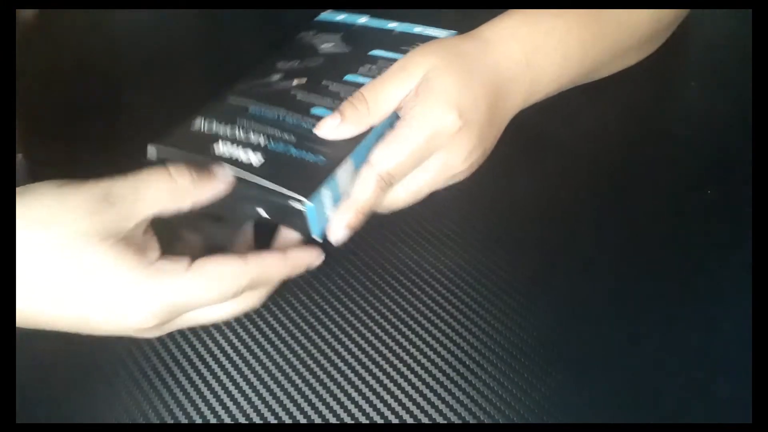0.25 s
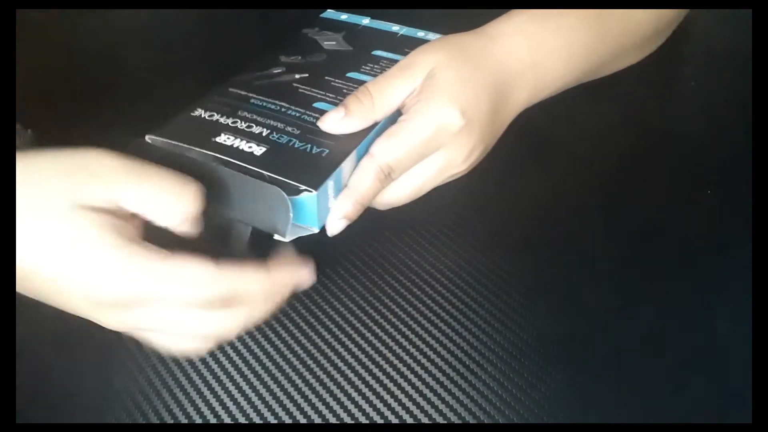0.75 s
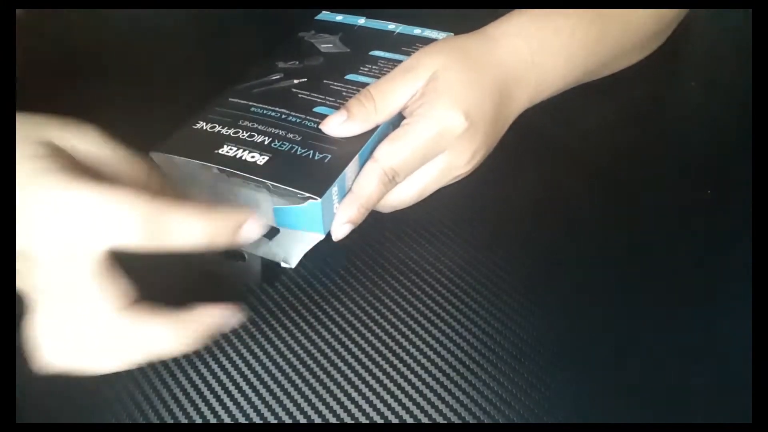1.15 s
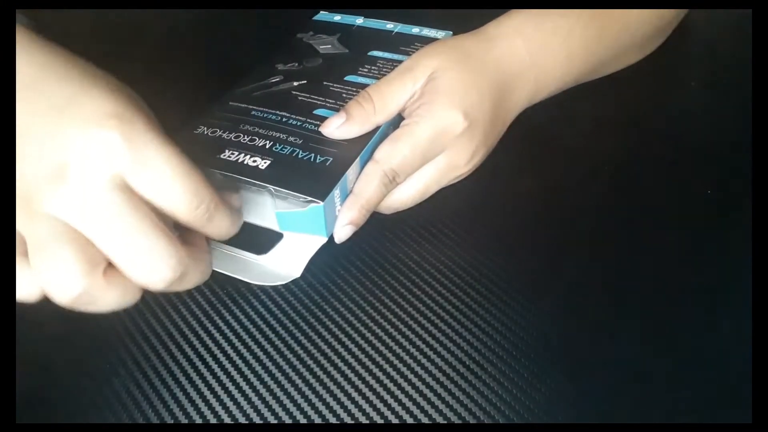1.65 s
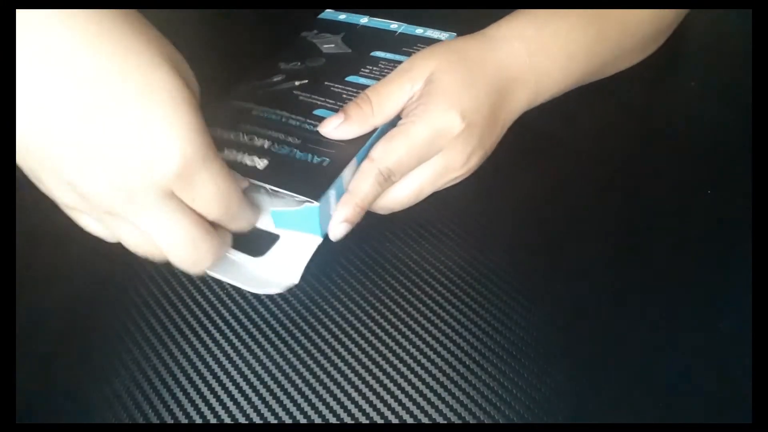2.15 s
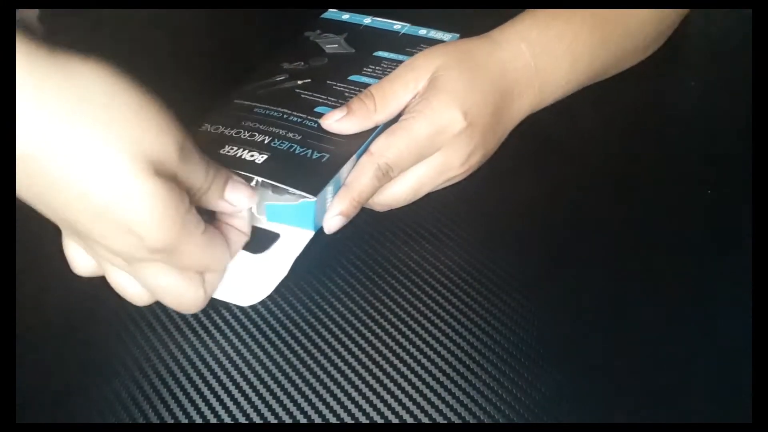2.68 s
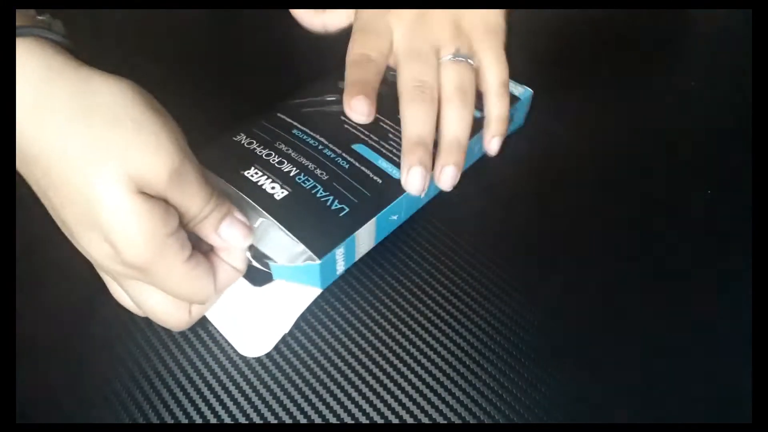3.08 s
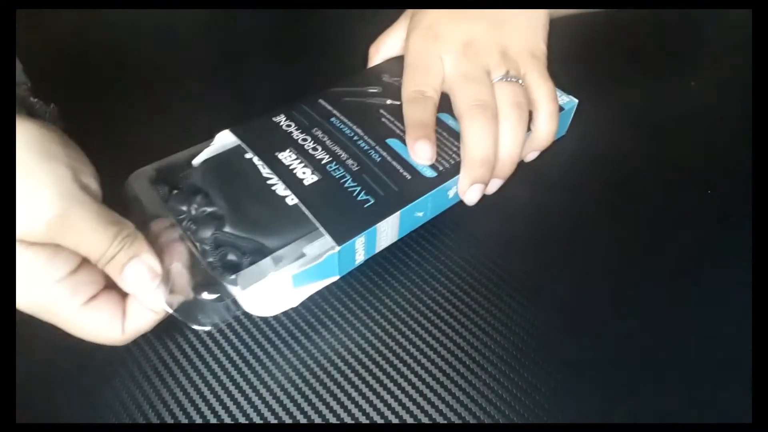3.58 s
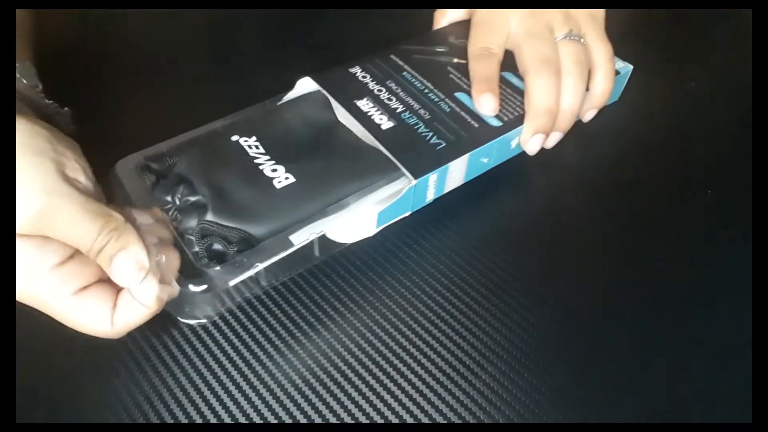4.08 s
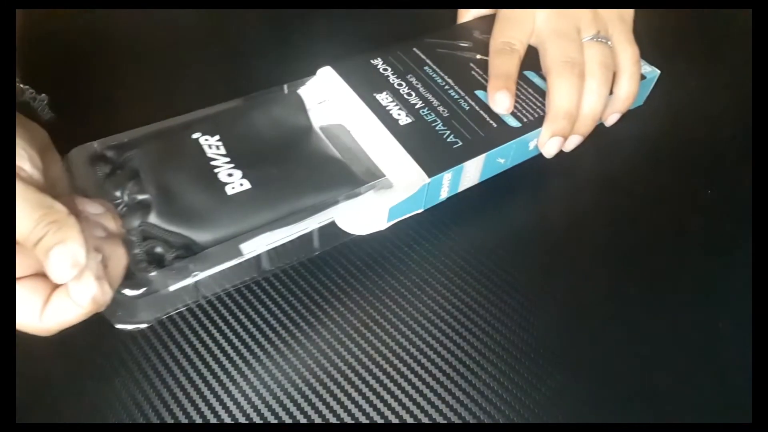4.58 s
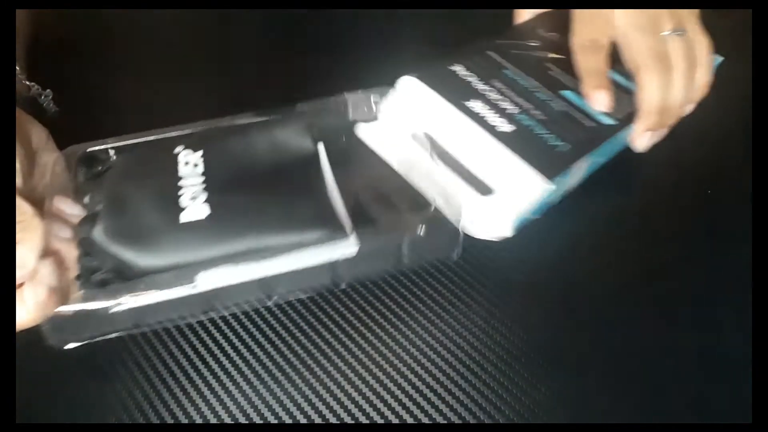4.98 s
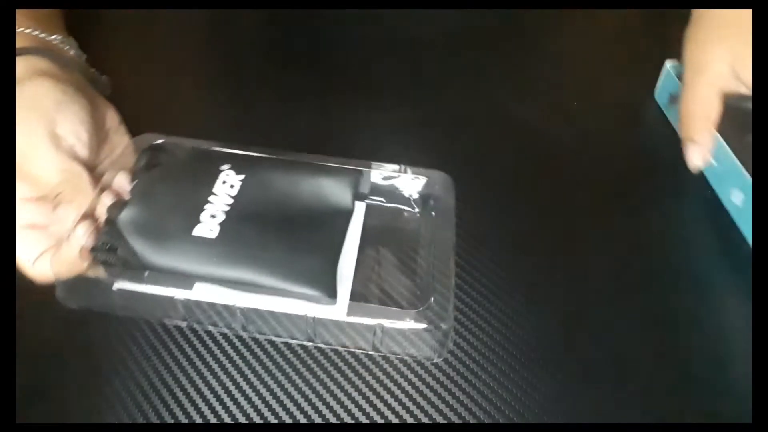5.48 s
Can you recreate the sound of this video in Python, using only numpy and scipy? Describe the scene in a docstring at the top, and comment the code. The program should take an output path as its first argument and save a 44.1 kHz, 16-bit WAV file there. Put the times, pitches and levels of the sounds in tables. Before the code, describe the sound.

Close, dry rustling of a cardboard box being opened, broken by sharp clicks, then a plastic tray scraping and crackling its way out.

```python
"""Soft rubbing and small snaps, close to a stereo microphone: hands open a cardboard box and slide a thin
plastic tray out of it. Stick-slip friction of fingers and tray on the board makes the rasp; buckling flaps
and tray snap and crackle. Both excite the modes of the sheets and the air in the box.
A small room reverberates; a low rumble, a brief hum and a faint hiss lie below."""
import sys
import numpy as np
from scipy import signal
from scipy.fft import rfft, irfft, next_fast_len
from scipy.io import wavfile

SR = 44100
rng = np.random.default_rng(int(sys.argv[2]) if len(sys.argv) > 2 else 0)


def generate_wav(sig):
    """Save sig (samples, or channels by samples) to the path in sys.argv[1] as 16-bit PCM at SR."""
    pcm = np.round(np.clip(np.atleast_2d(sig).T, -1, 1) * 32767).astype(np.int16)
    wavfile.write(sys.argv[1], SR, pcm)


N = 253310

# likeness of left and right: f/Hz, correlation
COHERENCE = [(60, .87), (300, 0.83), (1000, 0.66), (3000, 0.24), (12000, 0.16)]
# bending modes of board and tray: f/Hz, bandwidth/Hz, level/dB
SHEET_MODES = [(2390, 74, 4), (3007, 270, 3.5), (3850, 330, 2.5), (4820, 150, 2), (5700, 90, -2.5),
               (6716, 400, 4)]


def from_db(db):
    """Amplitude ratio of a level in dB."""
    return 10 ** (np.asarray(db) / 20)


def unit_rms(x):
    """Normalisation of each row to rms 1."""
    return x / np.sqrt(np.mean(x ** 2, axis=-1, keepdims=True) + 1e-20)


def in_time(rows):
    """Linear interpolation in time: one value per sample for each column after t/s."""
    times, *columns = np.transpose(rows)
    return [np.interp(np.arange(N) / SR, times, column) for column in columns]


def at_hz(points, hz):
    """Interpolation on a logarithmic frequency axis."""
    freqs, values = np.transpose(points)
    return np.interp(np.log(np.maximum(hz, 1)), np.log(freqs), values)


def band(x, low_hz, high_hz, order=2):
    """Maximally flat band-pass."""
    return signal.sosfilt(signal.butter(order, [low_hz, high_hz], "band", fs=SR, output="sos"), x)


def resonance(x, hz, width_hz):
    """Damped two-pole resonator of peak gain 1."""
    r = np.exp(-np.pi * width_hz / SR)
    poles = [1, -2 * r * np.cos(2 * np.pi * hz / SR), r * r]
    return signal.lfilter(np.array([1, 0, -1]) * (1 - r * r) / 2, poles, x)


def gliding_resonance(x, hz, width_hz):
    """Time-varying resonator, retuned block by block; the noise power passed stays even."""
    out, state, block = np.zeros_like(x), np.zeros((len(x), 2)), 256
    r = np.exp(-np.pi * np.maximum(width_hz, 20) / SR)
    for i in range(0, N, block):
        poles = [1, -2 * r[i] * np.cos(2 * np.pi * hz[i] / SR), r[i] ** 2]
        zeros = np.sqrt(1 - r[i] ** 2) * np.array([1, 0, -1])
        out[:, i:i + block], state = signal.lfilter(zeros, poles, x[:, i:i + block], zi=state)
    return unit_rms(out)


def drift(rate_hz):
    """Random modulation: low-passed noise of rms 1."""
    r = np.exp(-2 * np.pi * rate_hz / SR)
    return unit_rms(signal.lfilter([1], [1, -2 * r, r * r], rng.standard_normal(N + SR))[SR:])


def stereo_pair(mid, side, hz):
    """Partial coherence: sum and difference of unrelated signals give two sides, alike in the bass."""
    alike = np.clip(at_hz(COHERENCE, hz), 0, 1)
    return np.sqrt(1 + alike) * mid + np.sqrt(1 - alike) * side * [[1], [-1]]


def coloured(pair, spectrum):
    """Spectral shaping of two unrelated noises into left and right, each of rms 1."""
    size = next_fast_len(N)
    hz = np.arange(size // 2 + 1) * SR / size
    mid, side = rfft(pair, size) * from_db(at_hz(spectrum, hz))
    return unit_rms(irfft(stereo_pair(mid, side, hz), size)[:, :N])


def hiss(level_db=-71):
    """Stationary broadband noise: a faint steady hiss."""
    # noise spectrum: f/Hz, relative density/dB
    spectrum = [(180, -38), (300, -11.5), (2100, -20), (3460, -5.5), (7440, -8.5), (7820, -18),
                (15000, -2.5), (16000, -19)]
    return from_db(level_db) * coloured(rng.standard_normal((2, N)), spectrum)


def rumble():
    """Amplitude-modulated low noise: a rumble that comes and goes."""
    # envelope: t/s, level/dB
    envelope = [(0, -67.5), (.72, -65), (.9, -73), (1.7, -72.5), (2.3, -70), (2.9, -65), (3.13, -73),
                (3.8, -80), (4.05, -68), (4.9, -70), (5.74, -70.5)]
    # noise spectrum: f/Hz, relative density/dB
    spectrum = [(15, -35), (25, -17.5), (87, 2.5), (142, -1.5), (232, -13), (400, -12.5), (520, -43.5),
                (880, -120)]
    return from_db(in_time(envelope)[0]) * coloured(rng.standard_normal((2, N)), spectrum)


def hum(hz=110.4, width_hz=9.1):
    """Narrow-band noise is heard as a pitch: a low hum that swells briefly."""
    # envelope: t/s, level/dB
    envelope = [(2.05, -90.5), (2.2, -70), (2.4, -69.5), (2.58, -66.5), (2.66, -88.5)]
    return from_db(in_time(envelope)[0]) * unit_rms(resonance(rng.standard_normal(N), hz, width_hz))


def room(x, first_echo_s=0.0045):
    """Diffuse reverberation: convolution with octave bands of noise, each decaying exponentially."""
    # reverberation time: f/Hz, T60/s
    decay_times = [(200, 0.45), (530, 0.35), (1390, 0.32), (3680, 0.34), (9700, 0.36)]
    t, response = np.arange(SR // 2) / SR, 0
    for hz in 125 * 2.0 ** np.arange(8):
        mid, side = band(rng.standard_normal((2, len(t))), hz / np.sqrt(2), min(hz * np.sqrt(2), 20000))
        response += stereo_pair(mid, side, hz) * from_db(-60 * t / at_hz(decay_times, hz))
    response *= np.clip((t - first_echo_s) / 0.00043, 0, 1)
    response /= np.sqrt(np.sum(response ** 2, axis=1, keepdims=True))
    return signal.fftconvolve(x[None], response, axes=1)[:, :N]


def localise(x):
    """Level and time differences between the sides give the direction of hands and tray."""
    # place of the hands: t/s, left minus right level/dB
    balance = [(0.0, -2), (4.97, -1.5), (5.45, 2.5), (5.74, -2)]
    # the tray moves left: t/s, delay of the right side/ms
    lag = [(0, 0.013), (4.4, 0.041), (4.8, 0.056), (5.25, 0.18), (5.6, 0.4)]
    pan_db = in_time(balance)[0]
    delayed = np.arange(N) - np.round(in_time(lag)[0] * SR / 1000)
    right = x[1][np.clip(delayed, 0, N - 1).astype(int)]
    return np.array([x[0] * from_db(pan_db / 2), right * from_db(-pan_db / 2)])


def stroke_gains(grip_s=0.014, release_db_per_s=501.5):
    """Incoherent strokes add in power; each grips, swells or fades, then lets go."""
    # rubbing strokes: t/s, duration/s, rasp level/dB, swell/dB, body re rasp/dB, treble re rasp/dB
    strokes = [(0.0, 0.024, -57, -18, 6, 4), (0.015, 0.043, -70, 5, -2.5, 8),
               (0.089, 0.078, -81.5, 3, 10.5, -1), (0.179, 0.12, -65.5, 10, -2, -1.5),
               (0.248, 0.21, -56.5, 6.5, 1.5, -5.5), (0.458, 0.11, -52.5, 8.5, -8.5, -1.5),
               (0.553, 0.028, -46, 23, -3.5, 0.5), (0.587, 0.022, -35, -7, -4, -16),
               (0.692, 0.1, -44.5, -5.5, -7, 0), (1.024, 0.11, -69, -0.5, -4.5, -0.5),
               (1.11, 0.19, -61.5, -7, -13, -15), (1.302, 0.059, -66, -9.5, 4.5, -4),
               (1.411, 0.019, -58, 1, -8, -1.5), (1.457, 0.11, -61, 13, -10.5, -6),
               (1.766, 0.036, -67, 3, -9.5, -8.5), (1.875, 0.12, -53.5, -1, -0.5, -3),
               (2.017, 0.031, -57, 12.5, -9.5, -4), (2.101, 0.066, -60.5, -7.5, 2, -1.5),
               (2.176, 0.079, -55, 0, -2.5, -6.5), (2.291, 0.16, -58, 0, -1, -6.5),
               (2.546, 0.15, -63.5, 9, -2, -6), (2.709, 0.073, -25.5, -11.5, -12.5, 1.5),
               (2.883, 0.055, -55, -0.5, 9.5, -1), (2.97, 0.3, -68.5, -17.5, 8.5, -0.5),
               (3.067, 0.047, -56, -11.5, -3.5, -2), (3.207, 0.046, -63.5, -4.5, 2, -6.5),
               (3.285, 0.11, -56.5, 11.5, -6, -6), (3.401, 0.16, -45, -20.5, -6, -10),
               (3.567, 0.472, -62, 6, 1.5, -4), (4.022, 0.34, -60.5, -2, -3.5, -3),
               (4.446, 0.16, -69, 5.5, -1, -2.5), (4.613, 0.11, -44.5, -10.5, -3, -9.5),
               (4.714, 0.3, -51.5, 2.5, -1, -7), (4.952, 0.013, -30.5, -1, -3, -7.5),
               (5.012, 0.055, -45, 10, -8, -13.5), (5.089, 0.15, -35, -5.5, -9.5, -4.5),
               (5.3, 0.13, -37.5, -6.5, -8, -9), (5.393, 0.05, -41, 7, -14, -4),
               (5.445, .16, -38.5, -13.5, -8.5, -9), (5.522, 0.067, -58, -4, 12, -11),
               (5.605, 0.052, -48.5, 1, -6.5, -11.5), (5.67, 0.067, -47, -4, -9.5, -15.5)]
    t, power = np.arange(N) / SR, np.zeros((3, N))
    for start, length, rasp_db, swell_db, body_db, treble_db in strokes:
        span = slice(int(start * SR), int((start + length) * SR) + SR // 4)
        age = np.maximum(t[span] - start, 0)
        release_db = release_db_per_s * np.maximum(age - length, 0)
        level_db = rasp_db + swell_db * np.minimum(age / length, 1) - release_db
        envelope = np.minimum(age / grip_s, 1) * from_db(level_db)
        power[:, span] += (envelope * from_db([[0], [body_db], [treble_db]])) ** 2
    return np.sqrt(power)


def shifting_modes(x):
    """Modal modulation: as the contact moves and the sheet bends, modes come, go and slide in pitch."""
    out = 0
    for hz, width, db in SHEET_MODES:
        slide, swell_db = 1 + .05 * drift(2), 3 * drift(7)
        mode = gliding_resonance(x, hz * slide, np.full(N, width))
        out += np.sqrt(width) * from_db(db + swell_db) * mode
    return out


def rubbing(median_breaks_per_s=90, break_db=15, bump_share=0.14, room_db=-5.5):
    """Stick-slip friction: fibres slip and break in clumps, driving the box's air and the sheet modes."""
    # friction spectrum: f/Hz, relative density/dB
    spectrum = [(120, -49), (200, -12.5), (432, -4), (548, -1.5), (749, -8.5), (1100, -8), (1480, -8.5),
                (3020, -10), (6050, -9), (7830, -16.5), (13600, -13.5), (16000, -33.5)]
    # air resonance of the box, retuned by fingers and tray: t/s, f/Hz, bandwidth/Hz
    cavity = [(0, 698, 301.3), (.25, 1036, 351.6), (2.0, 881, 350.3), (2.4, 792, 295), (2.87, 933, 301.4),
              (2.9, 1260, 90.4), (2.955, 1258, 88.9), (2.98, 725, 258.4), (3.92, 900, 181.3),
              (4.1, 766, 148), (4.65, 795, 195.8), (4.9, 1070, 180), (5.2, 1050, 97.5), (5.33, 1000, 246.8),
              (5.41, 744, 96.7)]
    slips = rng.standard_normal((2, N)) * from_db(1.8 * drift(300) + 1.4 * drift(40))
    breaks = rng.random(N) < median_breaks_per_s * from_db(5 * drift(8)) / SR
    strength = from_db(break_db + 4 * np.minimum(rng.exponential(1, N), 3))
    friction = coloured(slips + breaks * strength * rng.choice([-1, 1], N), spectrum)
    low = unit_rms(band(friction, 280, 1600, order=3))
    middle = unit_rms(band(friction, 1400, 4120, order=3))
    bumps = from_db(4 * drift(12)) * unit_rms(band(friction, 120, 290))   # the box bumps in the hand
    body = .45 * low + gliding_resonance(low, *in_time(cavity)) + bump_share * bumps
    rasp = 0.76 * middle + unit_rms(shifting_modes(middle))
    treble = band(friction, 4600, 17000, order=3)
    rasp_gain, body_gain, treble_gain = stroke_gains()
    direct = body_gain * unit_rms(body) + rasp_gain * unit_rms(rasp) + treble_gain * unit_rms(treble)
    return localise(direct) + from_db(room_db) * room(direct[0])


def sheet_ring(clicks, hz, width_hz=1920):
    """Modal superposition: clicks excite one broad resonance and the modes of board and tray."""
    broad = resonance(resonance(clicks, hz, width_hz), hz, width_hz)
    modes = sum(from_db(db) * resonance(clicks, mode_hz, width) * (-1) ** k
                for k, (mode_hz, width, db) in enumerate(SHEET_MODES))
    ring = unit_rms(broad) + 0.32 * unit_rms(modes)
    return unit_rms(unit_rms(band(ring, 970, 6700)) + 0.63 * unit_rms(band(clicks, 1500, 5200)))


def box_ring(clicks, hz, panel_hz=358):
    """Cavity and panel resonance: the hollow box rings and its broad face thumps, more at low pitch."""
    hollow = unit_rms(band(resonance(clicks, hz, 0.5 * hz), .5 * hz, 2 * hz, order=3))
    panel = unit_rms(band(resonance(clicks[2], panel_hz, width_hz=70), 260, 520))
    return hollow + 0.2 * (600 / hz) ** 2.1 * panel


def snaps(rise_share=0.63, room_db=-9):
    """Buckling releases elastic energy in a few uneven clicks, which ring the sheet and the box."""
    # flaps and tray buckle: t/s, peak level/dB, sheet f/Hz, body f/Hz,
    # body re sheet/dB, treble re sheet/dB, burst duration/ms
    buckles = [(0.115, -44.5, 3970, 900, -7, 4, 1.5), (0.19, -37, 4350, 960, 1.5, -1.5, 3.2),
               (0.238, -29, 3950, 1240, 1.5, 2.5, 2.9), (0.256, -36, 3920, 960, -2, -3, 2.3),
               (0.302, -35.5, 2410, 1090, 1.5, -1, 1.9), (0.319, -32, 2420, 1150, -1, -4, 2.2),
               (0.363, -38.5, 3460, 900, -6, -7.5, 2), (0.386, -32, 3660, 910, 3, -7.5, 1.5),
               (0.401, -24, 4120, 482, 0, -1, 2.4), (0.449, -25, 3670, 950, 2, -5, 1.8),
               (0.572, -19, 4130, 820, -3, -11, 4.1), (0.583, -5.5, 4100, 369, -12, -22, 4.95),
               (0.699, -32, 3900, 1010, -11.5, -16, 8.1), (0.748, -4.5, 3470, 750, -14.5, -4, 2.47),
               (1.115, -32, 4080, 950, -8, -14, 4.5), (1.156, -41, 1460, 1190, -4, -22, 7.6),
               (1.22, -35, 3600, 1110, -7, -14, 2.5), (1.277, -33, 2830, 930, -10, -19, 2.4),
               (1.295, -33, 3220, 1143, 4, -13, 3.1), (1.511, -42, 3170, 1075, -4, -13, 6.6),
               (1.597, -40, 1586, 1323, -2, -16.5, 7.8), (1.871, -41, 3340, 875, -7, -2.5, 7.1),
               (1.956, -19, 3200, 1190, -4.5, -7, 2.77), (2.004, -36, 2280, 1200, -11, 2, 3.2),
               (2.151, -29.5, 3850, 960, -8.5, -19, 2), (2.537, -34, 4360, 910, -1, -9, 2.5),
               (2.6, -33.5, 2790, 975, -6, -17, 2.1), (2.611, -37.5, 1500, 1110, 14, -18, 3),
               (2.621, -32, 1830, 1160, 0.5, -14, 3.2), (2.655, -9.5, 2235, 1230, -9.5, -7, 2.3),
               (2.716, -3.5, 5700, 1010, -9.5, 0, 1.85), (2.729, -8, 5040, 690, -8.5, 4, 1.64),
               (2.941, -41, 1480, 299, 6, -17.5, 7), (2.982, -43, 1650, 858, 11, -14, 2.6),
               (3.084, -42, 1540, 922, 2.5, -6.5, 3.2), (3.226, -43, 1700, 1255, 2.5, -18.5, 4.8),
               (3.275, -31.5, 2110, 1050, -2, -8, 3.3), (3.414, -14.5, 3650, 770, -11.5, -5.5, 1.5),
               (3.575, -45.5, 2200, 900, 5, -14, 4.4), (3.61, -31, 2180, 1440, -2, -4.5, 3.3),
               (4.289, -31.5, 1740, 736, 9.5, -12.5, 3.8), (4.611, -15, 1540, 844, -5, -19, 5.4),
               (4.936, -17, 1640, 1250, 4, -23, 1.1), (4.947, -8.5, 1650, 850, -6.5, -20.5, 2.5),
               (4.977, -22.5, 2210, 1080, 6, -17, 4.1), (5.039, -16.5, 1730, 1270, 0, -7, 3.1),
               (5.044, -24, 1570, 1120, -4, -31, 2.9), (5.31, -37.5, 3500, 510, 0, -15, 12),
               (5.412, -28.5, 1500, 565, 14, -10, 3.1)]
    direct, to_room, size = np.zeros((2, N)), np.zeros(N), 2048
    t = np.arange(size) / SR
    for start, peak_db, sheet_hz, body_hz, body_db, treble_db, burst_ms in buckles:
        length = max(burst_ms, .3) / 1000
        envelope = np.minimum(t / (rise_share * length), 1) * np.exp(-(t / length) ** 1.39)
        burst = rng.standard_normal((2, size)) * from_db(3.8 * rng.standard_normal(size)) * envelope
        # heard from all round, the burst evens out to one plain click of the same energy
        impulse = (t == 0) * np.sqrt(np.sum(burst[0] ** 2))
        clicks = np.vstack([burst, impulse])
        snap = sheet_ring(clicks, sheet_hz) + from_db(body_db) * box_ring(clicks, body_hz)
        snap += from_db(treble_db) * unit_rms(band(clicks, 5800, 17000))
        mid, side, diffuse = snap * from_db(peak_db) / np.abs(snap[0]).max()
        side = 0.53 * band(side, 1200, 13000, order=1)   # the sides differ above the bass
        at = round(start * SR)
        direct[:, at:at + size] += mid + side * [[1], [-1]]
        to_room[at:at + size] += from_db(room_db) * band(diffuse, 300, 22000)
    return localise(direct) + room(to_room)


def scene():
    """Superposition of the snaps and rubbing in the room with the background."""
    return snaps() + rubbing() + rumble() + hum() + hiss()


def record(dry, port_hz=12540, port_db=-6.5, ceiling=.85, cutoff_hz=17000):
    """Microphone port resonance lifts the treble, saturation rounds the peaks, low-passes cut the top."""
    lifted = dry + from_db(port_db) * resonance(dry, port_hz, width_hz=2200)
    rounded = lifted / (1 + (lifted / ceiling) ** 6) ** (1 / 6)
    rolled_off = signal.sosfilt(signal.butter(8, 15400, fs=SR, output="sos"), rounded)
    return signal.sosfilt(signal.cheby2(16, 100, cutoff_hz, fs=SR, output="sos"), rolled_off)


dry = scene()
out = record(dry)
generate_wav(out)
```